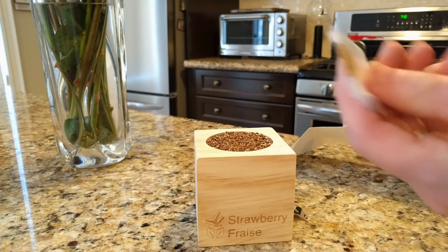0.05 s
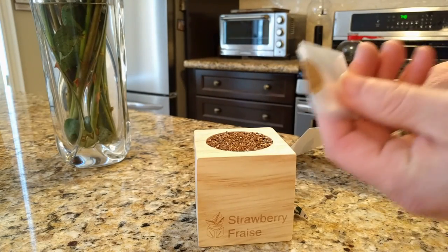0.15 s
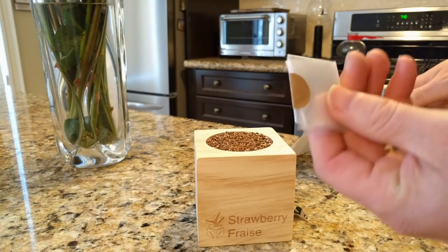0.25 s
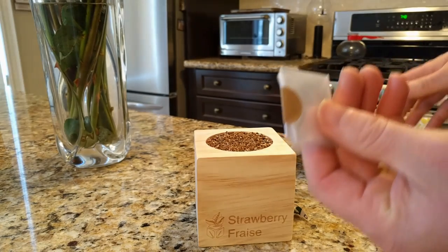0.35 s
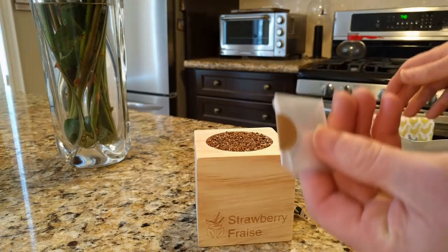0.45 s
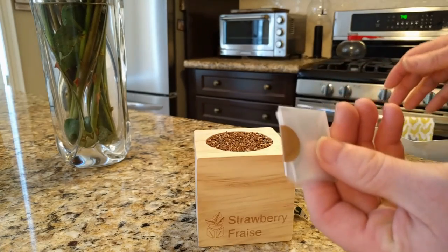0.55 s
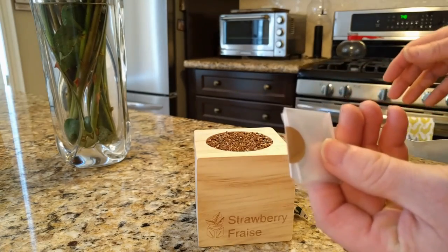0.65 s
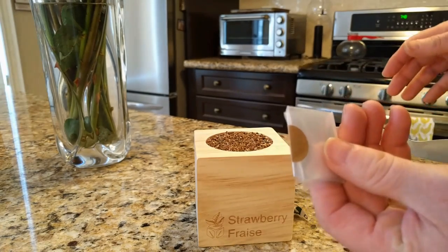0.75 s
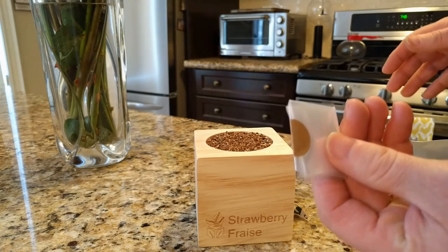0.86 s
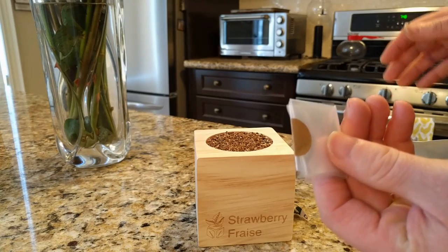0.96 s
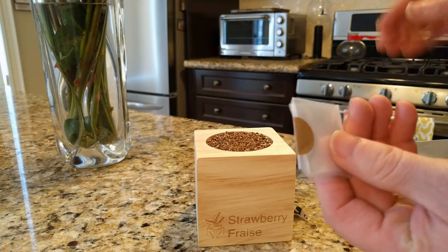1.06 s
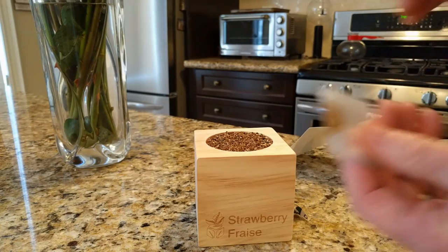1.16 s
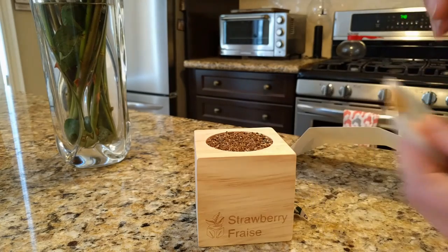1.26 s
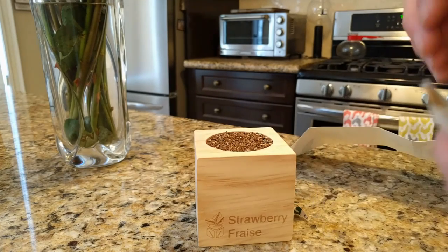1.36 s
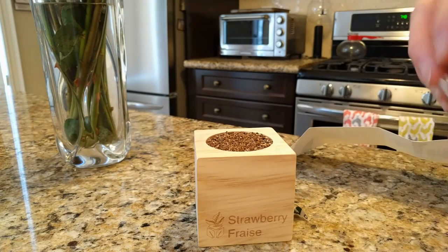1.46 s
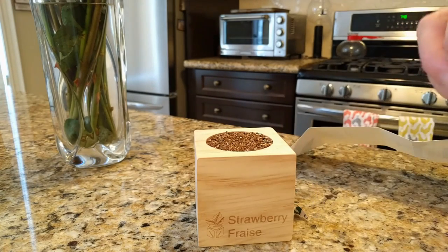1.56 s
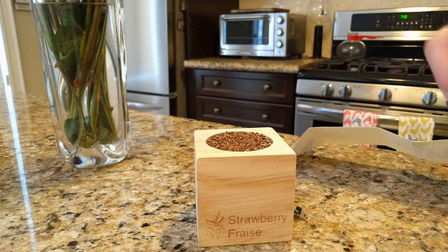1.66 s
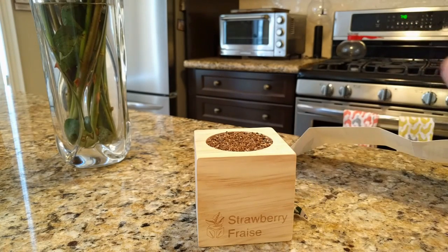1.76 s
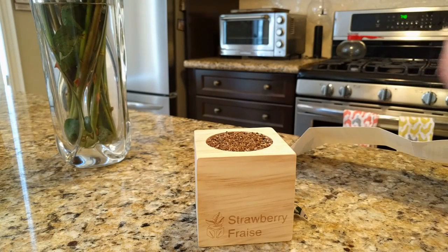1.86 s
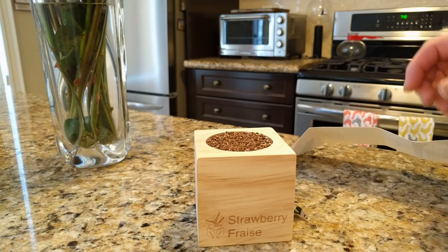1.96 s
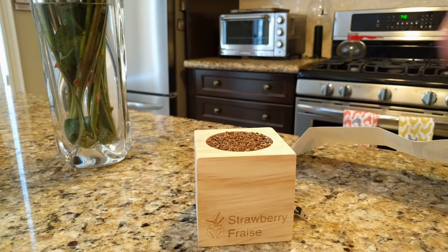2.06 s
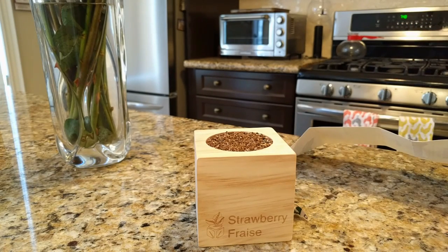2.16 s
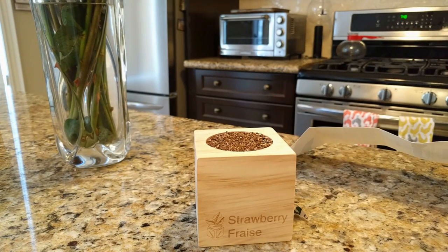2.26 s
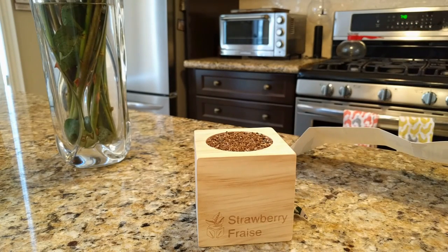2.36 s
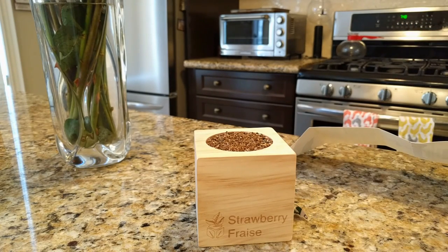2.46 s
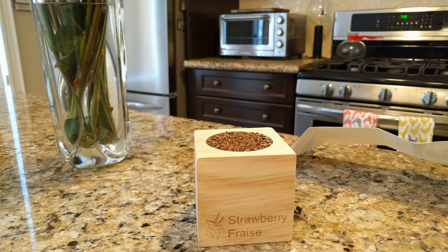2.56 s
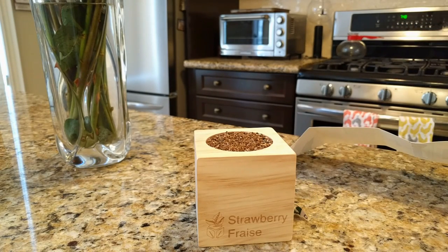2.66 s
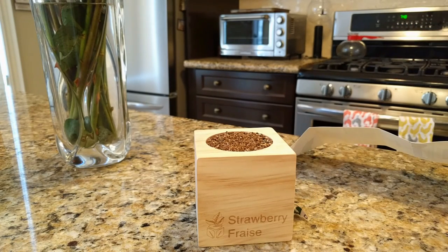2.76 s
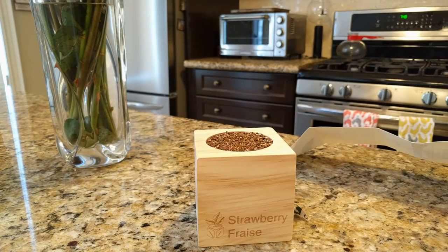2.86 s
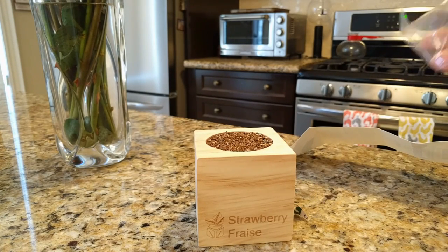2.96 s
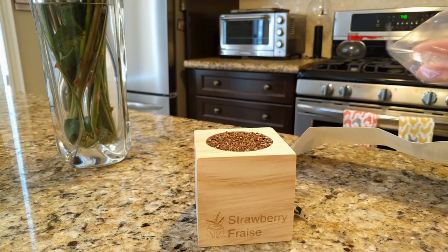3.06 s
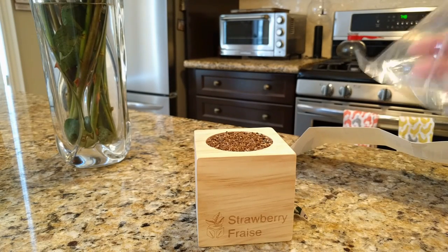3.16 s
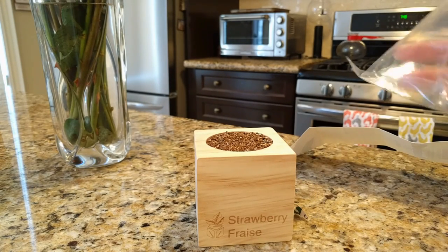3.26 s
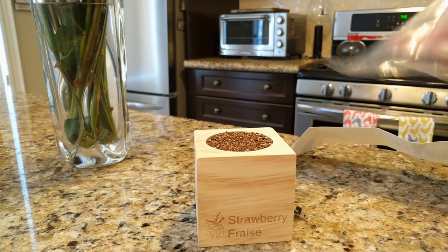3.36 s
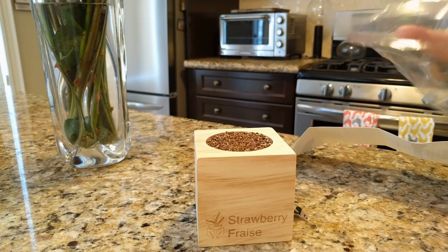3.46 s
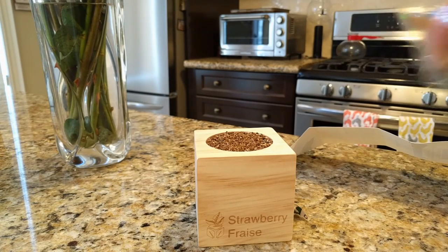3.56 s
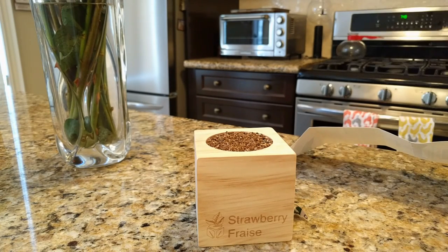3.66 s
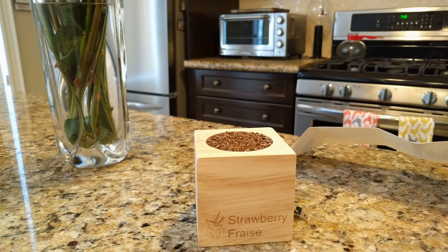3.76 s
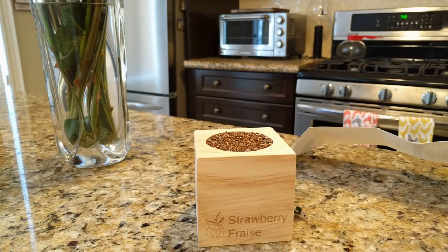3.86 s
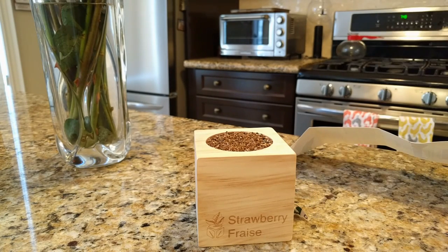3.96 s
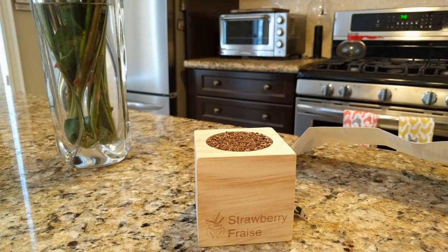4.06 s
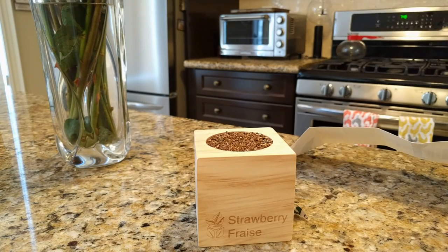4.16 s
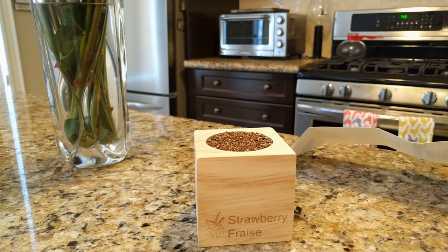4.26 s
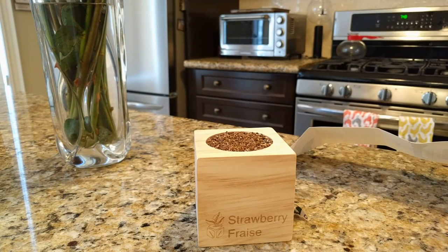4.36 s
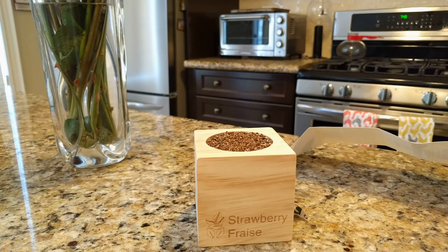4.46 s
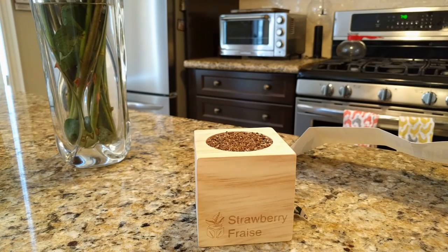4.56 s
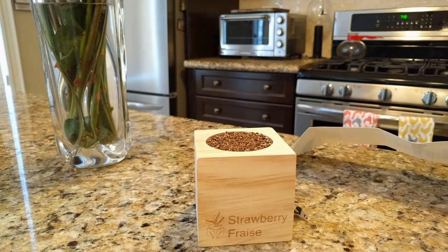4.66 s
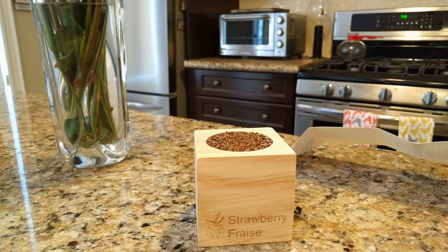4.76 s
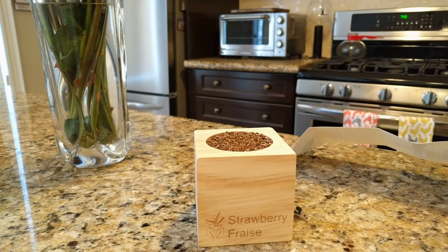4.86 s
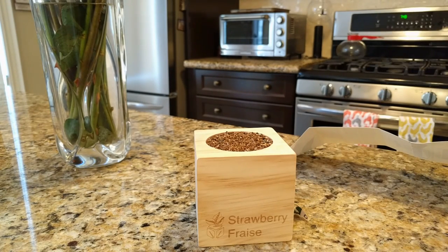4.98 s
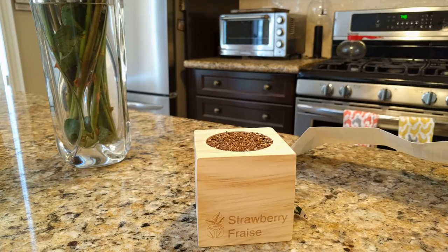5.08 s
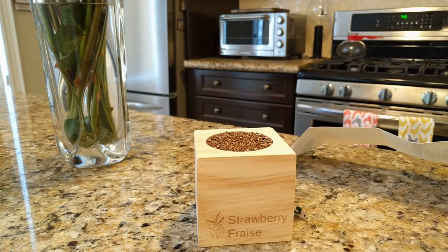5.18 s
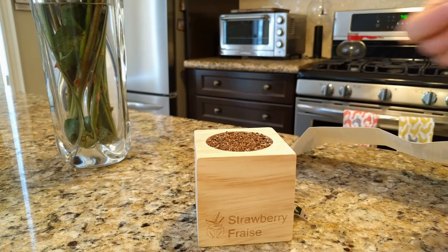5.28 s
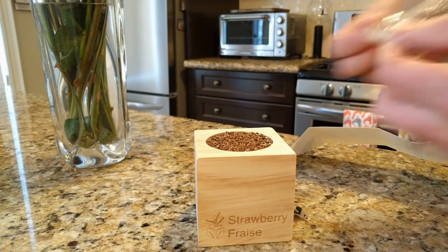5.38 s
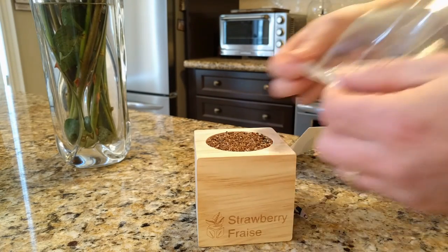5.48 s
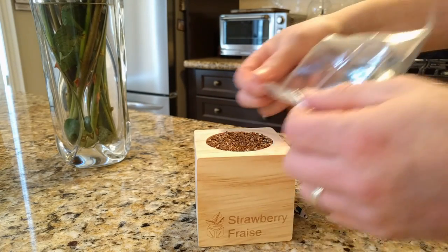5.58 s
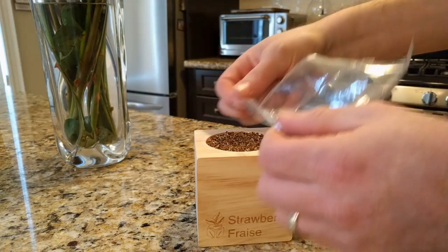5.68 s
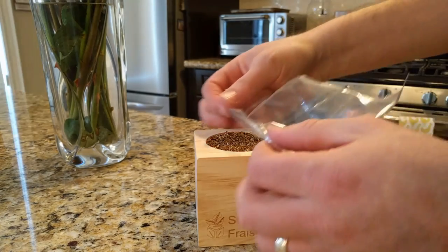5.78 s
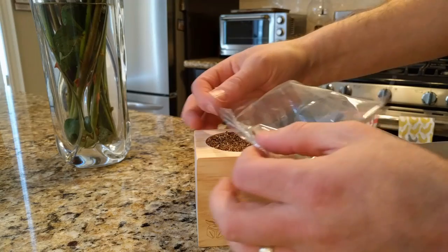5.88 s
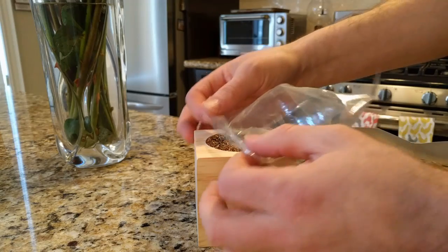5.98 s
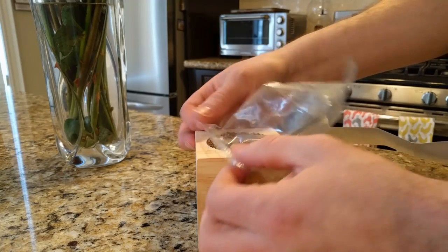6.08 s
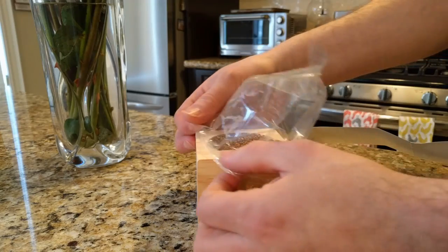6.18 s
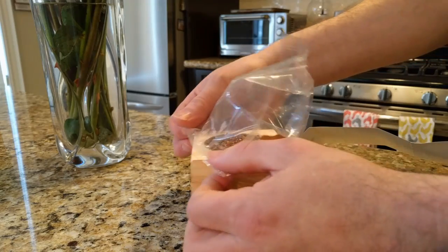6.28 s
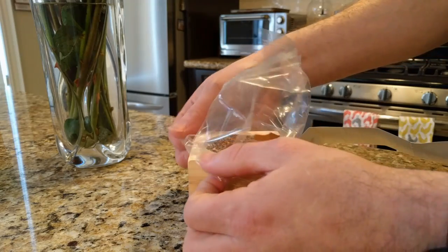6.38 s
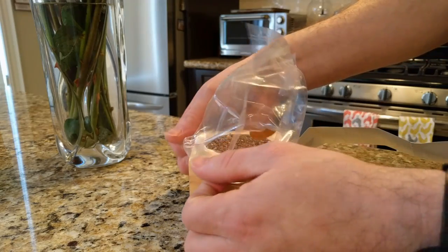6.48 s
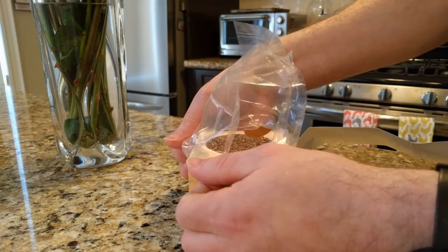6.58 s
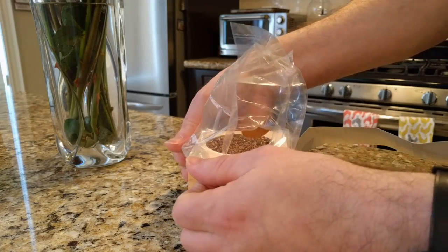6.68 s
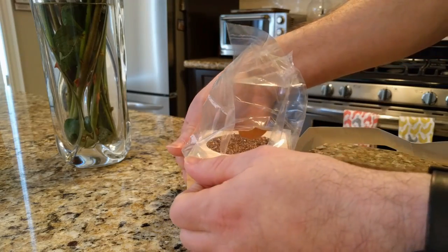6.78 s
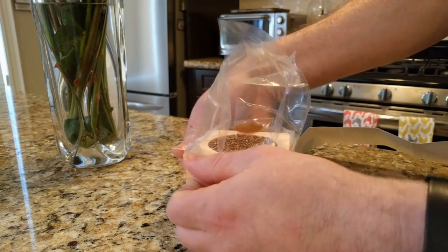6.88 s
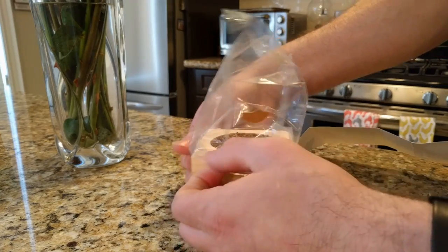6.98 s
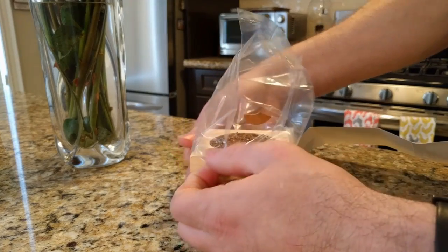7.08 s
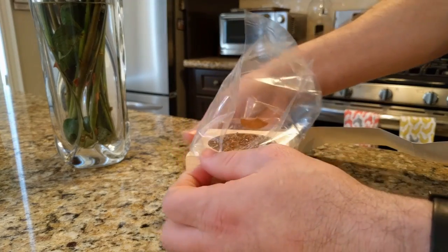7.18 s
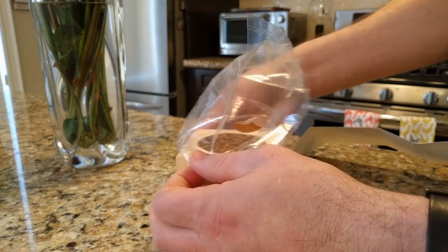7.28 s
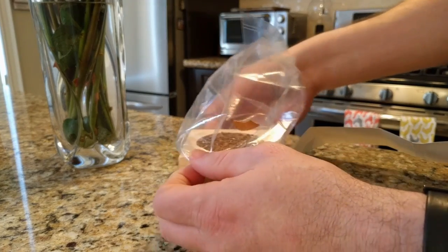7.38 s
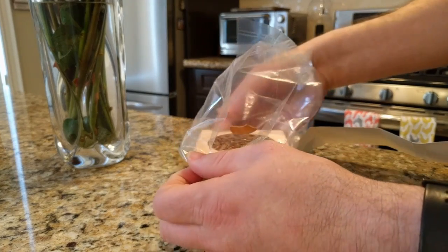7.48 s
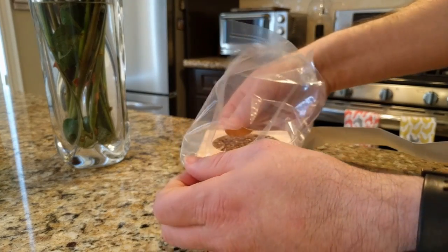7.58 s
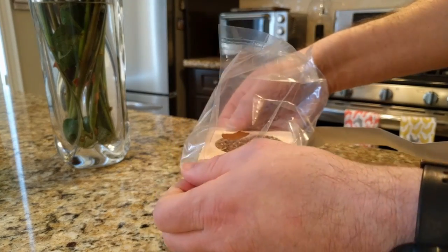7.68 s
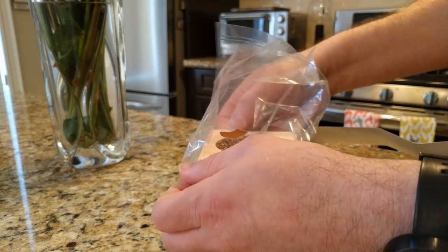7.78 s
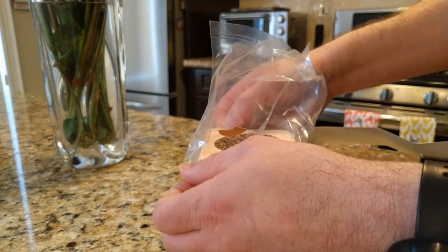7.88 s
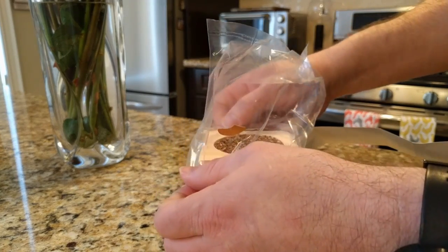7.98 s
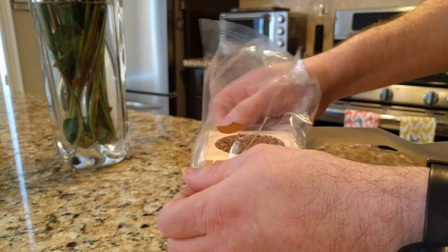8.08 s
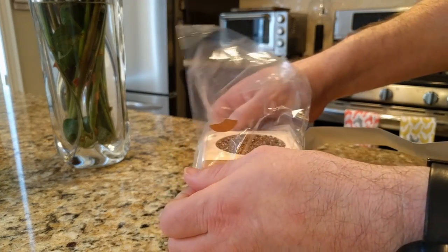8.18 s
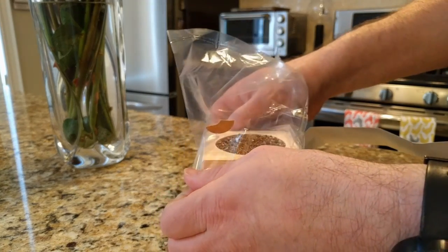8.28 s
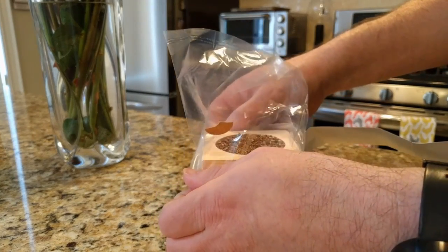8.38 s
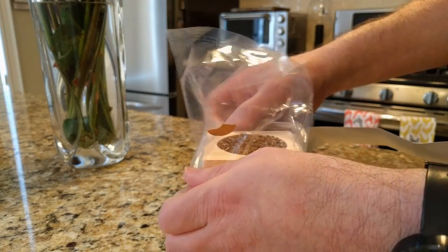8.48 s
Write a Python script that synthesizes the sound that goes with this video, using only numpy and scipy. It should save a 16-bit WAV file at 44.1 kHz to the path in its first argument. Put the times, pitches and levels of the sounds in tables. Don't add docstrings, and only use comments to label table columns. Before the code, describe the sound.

Hands work a thin plastic bag indoors, close and dry with a brief room reflection. A quiet opening with faint hum and small ticks gives way to vigorous crinkling, fine crackle and crisp snaps. After a short lull it crackles again, with low puffs and dull bumps. Pulled over a wooden block, it gives a short hiss of friction, sparser rustles and pops, and finally a faint, very high finger squeak.

```python
import sys
import numpy as np
from scipy import signal
from scipy.fft import rfft, irfft
from scipy.io import wavfile
from scipy.ndimage import uniform_filter1d

SR = 44100
rng = np.random.default_rng(int(sys.argv[2]) if len(sys.argv) > 2 else 0)


def gain_from_db(level_db):
    decades = np.asarray(level_db, float) / 20
    return 10 ** decades


def put_to_file(sound):
    columns = np.atleast_2d(sound).T
    safe = np.clip(columns, -1, 1)
    whole_steps = np.round(safe * 32767)
    wavfile.write(sys.argv[1], SR, whole_steps.astype(np.int16))


N = 376173

# (frequency [Hz], gain [dB])
FILM = [(300, -19.5), (1000, -17.5), (1350, -18), (1650, -9.5), (2300, -5.5), (3800, -5.5), (8000, -2),
        (15000, -1.5)]
# (frequency [Hz], gain [dB])
ON_WOOD = [(200, -12), (600, -4.5), (1000, -5.5), (1600, -1), (2600, 1), (5000, 3), (8000, 3), (15000, 3)]


def evened(x):
    return x / np.sqrt(np.mean(x ** 2) + 1e-20)


def read(points, hz):
    f, value = np.transpose(points)
    return np.interp(np.log(hz + 1), np.log(f + 1), value)


def colour(x, points):
    log_gain = read(points, abs(np.fft.fftfreq(4096, 1 / SR))) * np.log(10) / 20
    taps = np.fft.ifft(np.exp(np.conj(signal.hilbert(log_gain)))).real[:2048]
    return signal.oaconvolve(x, taps)[:len(x)]


def resonate(x, hz, width):
    r = np.exp(-np.pi * width / SR)
    return signal.lfilter([1 - r], [1, -2 * r * np.cos(2 * np.pi * hz / SR), r * r], x)


def soften(x, hz, order=1, kind="low"):
    return signal.sosfilt(signal.butter(order, hz, kind, fs=SR, output="sos"), x)


def bands(x):
    body = soften(x, 7000, order=2)
    return body, x - body


def kitchen():
    # (frequency [Hz], gain [dB])
    floor_colour = [(25, -25), (60, -2), (150, -6), (500, -9.5), (1150, -16.5), (3000, -22.5),
                    (15500, -24.5)]
    # (frequency [Hz], width [Hz], level [dB])
    hum_lines = [(196.6, 14, -70.5), (303.5, 12, -77), (509, 10, -78.5)]
    out = gain_from_db(-66) * evened(colour(rng.standard_normal(N), floor_colour))
    for hz, width, db in hum_lines:
        out += gain_from_db(db) * evened(resonate(rng.standard_normal(N), hz, width))
    return out


def room(x):
    # (frequency [Hz], time to fall 60 dB [s])
    decay_times = [(300, 0.79), (2000, 0.21), (16000, 0.2)]
    taps = np.zeros(SR // 2)
    at = np.arange(300, SR // 2 - 20, 20)
    taps[at + rng.integers(0, 20, len(at))] = rng.choice([-1., 1.], len(at))
    hz, t, z = signal.stft(taps, SR, nperseg=256)
    t60 = np.maximum(read(decay_times, hz), .05)[:, None]
    tail = signal.istft(z * gain_from_db(-60 * t / t60), SR, nperseg=256)[1]
    return signal.fftconvolve(x, tail / np.linalg.norm(tail))[:N]


def air(level_db, clumps, creases):
    # (frequency [Hz], gain [dB])
    puff_colour = [(25, -26), (45, -6.5), (70, 3), (110, -0.5), (550, -3.5), (1000, -10), (1600, -5.5),
                   (4000, -82)]
    t = np.arange(N) / SR
    level_db = np.minimum(level_db, np.where(t > 4, -49, -43))
    shove = np.sqrt(abs(uniform_filter1d(creases ** 2, 250)))
    drive = (gain_from_db(level_db - 5.0 + 3.3 * clumps) + gain_from_db(-26.5) * shove) * rng.standard_normal(N)
    puffs = colour(drive, puff_colour) / np.linalg.norm(colour(signal.unit_impulse(2048), puff_colour))
    deep = soften(puffs, 200)
    thin = soften(puffs, 900, kind="high")
    return puffs - 0.39 * (t > 4.9) * deep - 0.6 * (t > 5.7) * thin


def thumps():
    # (time of peak [s], peak level [dB], hollow [Hz])
    knocks = [(2.2277, -49.5, 523), (2.441, -50, 560), (2.472, -48, 393), (3.528, -48, 730),
              (3.6216, -47, 260), (3.7969, -44, 454), (4.5504, -49, 606), (4.7345, -46, 960),
              (4.847, -55, 580), (5.0452, -46, 776), (5.233, -49, 450), (5.2662, -39.5, 592),
              (5.5829, -48, 1200), (5.7497, -55, 970), (7.8397, -46, 650), (6.2977, -46, 830),
              (6.701, -49, 1270), (6.8093, -45, 390), (7.3255, -49, 880), (7.5344, -52, 675),
              (7.5967, -46, 585), (7.6057, -41, 770), (7.635, -44.5, 1190), (7.674, -50, 726),
              (7.95, -39, 1330), (8.4396, -46, 680)]
    rise_ms = 1.4
    out = np.zeros(N + 900)
    u = np.arange(900) / SR * 1000 / rise_ms
    for (s, db, hz), noise in zip(knocks, rng.standard_normal((len(knocks), 900))):
        shove = u * np.exp(-u) * noise
        knock = resonate(resonate(shove, hz, 0.6 * hz), hz, 1.3 * hz)
        power = uniform_filter1d(knock ** 2, size=130)
        at = round(s * SR) - power.argmax()
        out[at:at + 900] += gain_from_db(db + 0.5) * knock / np.sqrt(power.max())
    return out[:N]


def slide(start, end, hz, db):
    u = np.clip((np.arange(N) / SR - start) / (end - start), 0, 1)
    hiss = rng.standard_normal(N)
    lowered = np.clip(.5 + 5.5 * (u - .62), 0, 1)
    high_hollow = evened(resonate(hiss, 1.1 * hz, 394.0))
    low_hollow = evened(resonate(hiss, 0.904 * hz, 260.0))
    hollow = np.sqrt(1 - lowered) * high_hollow + np.sqrt(lowered) * low_hollow
    return gain_from_db(db) * np.sin(np.pi * u ** 1.05) * ((0.37 + 1.16 * u) * hollow + 1.33 * hiss)


def slides():
    # (start [s], end [s], hollow [Hz], level [dB])
    edge_slides = [
        (0.19, 0.42, 2110, -75),
        (1.64, 1.8, 3500, -77),
        (5.807, 5.921, 3950, -49.5),
        (6.37, 6.44, 3280, -52.5),
    ]
    return sum(slide(*row) for row in edge_slides)


def squeak(rows):
    s, hz, db = np.transpose(rows)
    t = np.arange(N) / SR
    wobble_hz = 24.0 * evened(uniform_filter1d(rng.standard_normal(N), 120))
    turns = np.cumsum(np.interp(t, s, hz) + wobble_hz) / SR
    gate = np.clip(np.minimum(t - s[0], s[-1] - t) / .008, 0, 1)
    level_db = np.interp(t, s, db) - 1.5 + 3.2 * evened(uniform_filter1d(wobble_hz, 900))
    return np.sqrt(2) * gain_from_db(level_db) * gate * np.sin(2 * np.pi * turns)


def squeaks():
    # (time [s], pitch [Hz], level [dB])
    strokes = [
        [(8.015, 13700, -62), (8.06, 13600, -62), (8.13, 14000, -63), (8.3, 13850, -65), (8.39, 13300, -67)],
        [(8.32, 12500, -70), (8.36, 12300, -70), (8.41, 12050, -69)],
        [(8.455, 13000, -65), (8.53, 12350, -63)],
    ]
    return sum(squeak(rows) for rows in strokes)


def hands():
    # (time hardest [s], fine crackle [dB], swell [s], fade [s])
    finger_squeezes = [(0, -58, .1, 0.58), (1.84, -55.5, 0.41, 0.071), (2.282, -35, 0.061, 0.15),
                       (2.545, -35.5, 0.25, 1), (2.75, -31, 0.11, 0.18), (2.921, -33, 0.3, 0.2),
                       (3.098, -37, 0.2, 0.44), (3.223, -36.5, 0.81, 0.067), (3.373, -39, 0.25, 0.26),
                       (3.552, -38.5, 0.11, 0.33), (3.632, -35.5, 0.12, 0.095), (3.779, -40.5, 0.15, 0.13),
                       (4.136, -48, 0.53, 0.83), (4.4, -42.5, 0.27, 0.61), (4.711, -37, 0.15, 0.52),
                       (5.05, -42, 1.3, 0.93), (5.253, -40, 0.35, 0.2), (5.54, -44.5, 1.9, 0.2),
                       (5.75, -54.5, 1.9, 0.38), (6.266, -49.5, 0.76, 0.31), (6.41, -48.5, 0.09, 0.28),
                       (6.79, -52, 0.56, 0.27), (6.954, -47, 0.093, 0.24), (7.25, -53.5, 1.4, 1),
                       (7.458, -42.5, 0.035, 0.11), (7.597, -45, 0.046, 0.14), (7.726, -42.5, 0.035, 0.36),
                       (8.002, -47, 0.34, 0.13), (8.241, -51.5, 0.62, 0.6), (8.436, -48.5, 0.24, 0.41)]
    # (time [s], treble share of the crackle [dB], air pushed at a middling squeeze [dB])
    grip = [(0, -1, -55), (2.15, -4, -60), (2.5, -5.5, -56), (3, -4.5, -59), (3.55, -5.5, -54),
            (4.7, -3.5, -58), (5.7, -3.5, -54.5), (6.0, 1, -48.5), (6.45, -4, -53.5), (7.1, -1.5, -43),
            (7.9, 2, -51), (8.1, -1, -46), (8.5, -2.5, -53.5)]
    rest_db, middling_db = -79.5, -48.5
    t = np.arange(N) / SR
    level_db = np.full(N, rest_db)
    for s, db, swell, fade in finger_squeezes:
        away = np.where(t < s, (s - t) / swell, (t - s) / fade)
        level_db = np.maximum(level_db, db - 20 * away)
    harder_db = level_db - middling_db
    s, treble_db, air_db = np.transpose(grip)
    treble_db = np.interp(t, s, treble_db) + 0.215 * (harder_db - 5.5)
    air_db = np.interp(t, s, air_db) + 0.81 * harder_db
    return level_db, treble_db, air_db


def crackle(level_db, treble_db):
    t = np.arange(N) / SR
    held = t > 2.2
    drift = uniform_filter1d(uniform_filter1d(rng.standard_normal(N), 300), 300)
    clumps = held * np.tanh(evened(drift))
    chance = 640.0 * gain_from_db(4.0 * clumps + 0.4 * (level_db + 48)) / SR
    size = held * gain_from_db(4.1 * np.minimum(rng.exponential(1, N), 1.9)) * (rng.random(N) < chance)
    patch = rng.integers(0, 40, N)
    out = np.zeros(N)
    for k, hz in enumerate(np.geomspace(1400, 13000, num=40)):
        grain = snap(hz, 0.59 * rng.standard_normal(), rng.uniform(0.45, 1.58), -6.0, rng.standard_normal(500))
        grain = evened(grain)[::(-1) ** k]
        out += signal.oaconvolve(size * (patch == k), grain)[:N]
    out /= gain_from_db(0.08 * (level_db + 45))
    rub = gain_from_db(-5.0 + 7.7 * clumps - 0.16 * (level_db + 39)) * rng.standard_normal(N)
    fine = evened(out) + rub
    on_block = np.clip((t - 5.6) / 0.47, 0, 1)
    free_film = evened(colour(fine, FILM))
    block_film = evened(colour(fine, ON_WOOD))
    body, treble = bands((1 - on_block) * free_film + on_block * block_film)
    return gain_from_db(level_db + 2.0) * (body + gain_from_db(treble_db) * treble), clumps


def snap(hz, treble_db, ms, ring_db, noise):
    u = np.arange(len(noise)) / SR * 1000 / ms
    decay = gain_from_db(-12.5 * u ** 1.59) + gain_from_db(-15.5 - 2.17 * u)
    rattle = noise * abs(noise) ** 0.77 * decay * (1 - np.exp(-u / 0.21))
    rattle[8:11] += 4.74 / ms * np.sign(noise[0]) * np.array([1, -1, -.5])
    z = rfft(rattle)
    flat = z / np.sqrt(uniform_filter1d(abs(z) ** 2, size=70))
    rattle = irfft(flat) * np.sqrt(np.sum(rattle ** 2))
    body, treble = bands(rattle)
    body = body - 0.33 * soften(body, 0.18 * hz)
    ring = evened(resonate(rattle, hz, 220.0 + 0.12 * hz)) * np.std(rattle)
    return body + gain_from_db(treble_db - 3.5) * treble + gain_from_db(ring_db + 7600.0 / hz) * ring


def snaps(table, film, gain_db, level_db):
    out = np.zeros(N + 800)
    for (s, db, hz, treble_db), noise in zip(table, rng.standard_normal((len(table), 800))):
        at = round(s * SR)
        drag = gain_from_db(0.3155 * (level_db[at] + 22 - db))
        ms = (1.47 + 610 / hz) * drag
        sound = colour(snap(hz, treble_db, ms, ring_db=-8.5, noise=noise), film)
        peak = np.sqrt(uniform_filter1d(sound ** 2, size=30).max())
        out[at:at + 800] += gain_from_db(db + gain_db) * sound / peak
        out[at - 200:at] += gain_from_db(db + gain_db - 20.0 + 7.0 * noise[1]) * sound[200:0:-1] / peak
    return out[:N]


def ticks(table):
    rise_s = .0004
    return [(s - rise_s, db, hz, 0.5 + 6.5 * np.log2(hz / 5000)) for s, db, hz in table]


def buckling(level_db):
    # (time [s], peak level [dB], ring
    # of the freed patch [Hz], treble against body [dB])
    brushed = [(1.494,-55,4000,-4),(1.562,-58,3150,-10),(1.5785,-58,3200,-15),(1.6234,-50,13600,7),(1.643,-41,7900,6),(1.684,-36.5,8040,8),(1.8133,-45.5,3200,-8),(1.8269,-41,3030,1)]
    unfolded = [(2.26,-32,3300,-12),(2.2743,-25,5900,-1.5),(2.424,-25,2980,2),(2.5193,-20,7300,11),(2.536,-28,11300,4),(2.551,-24,4340,2),(2.557,-23,13600,11),(2.594,-18.5,13800,5),(2.651,-22,13700,10),(2.676,-16,4300,8),(2.6936,-23,10500,5),(2.7072,-24,2160,2),(2.7329,-22,10400,2),(2.7778,-23,10200,8),(2.8713,-22,6770,4),(2.8767,-22.5,4170,-24),(2.9307,-30,5200,-1),(2.9358,-22,6800,1),(3.0133,-28,7050,-3),(3.018,-26,2800,-1),(3.0598,-21.5,4840,-6.5),(3.1032,-30.5,3680,-9),
                (3.2107,-22,3000,-2),(3.227,-19,11200,8),(3.2455,-26,5100,-14),(3.2632,-26,7950,4),(3.2767,-27,11400,8),(3.329,-26.5,2820,2),(3.3681,-24.5,5930,6),(3.372,-21,2950,-2),(3.4286,-25.5,9900,15),(3.4398,-22.5,9500,-25),(3.5374,-30.5,3280,-11.5),(3.557,-21.5,2680,-27),(3.5633,-22,8850,-9),(3.5733,-24.5,2470,-19),(3.5933,-28,2200,-9),(3.644,-27.5,3000,-6),(3.7053,-34.5,1770,-13),(3.7503,-24.5,1760,-1),(3.7568,-32.5,2360,-16),(3.7768,-27,1980,-8),(3.802,-30,7100,9),(3.8718,-23,4300,1),(3.9539,-36.5,2080,-3),(4.039,-34.5,6600,-7),(4.061,-37,5640,1),(4.1217,-35,7500,8),(4.1364,-32.5,4820,-5),(4.1772,-31,6100,3),(4.3024,-30,12400,5),
                (4.4213,-26,13400,13),(4.4574,-21.5,4650,2.5),(4.4748,-31,7900,-1),(4.518,-35,3000,-11),(4.5506,-39,4700,-4),(4.5881,-23.5,12400,1),(4.635,-29.5,2770,4),(4.656,-21.5,12700,11),(4.669,-28.5,4700,-9),(4.684,-28.5,7640,-14),(4.745,-32,2940,17),(4.7663,-27,8100,11),(4.8058,-23,12800,-4),(4.817,-20,8000,-13),(4.8744,-25.5,4940,2.5),(4.904,-21.5,9450,12),(4.941,-25,3020,-3),
                (5.001,-30,7060,-5),(5.046,-22,11200,27),(5.1025,-29.5,1870,-8),(5.1148,-24,7140,7),(5.1468,-27.5,5770,-1.5),(5.1807,-28,12100,-1),(5.197,-27,3700,3),(5.244,-24.5,7400,-3),(5.2548,-23.5,2570,13),(5.266,-22.5,1690,-3.5),(5.347,-30,3340,-2),(5.4124,-32,6500,16),(5.4258,-25,4060,4),(5.45,-19.5,5700,0),(5.471,-28.5,2410,-14),(5.5041,-23,3960,2),(5.5204,-31,4800,1),(5.5417,-35,3000,-6),(5.547,-21.5,13200,10),(5.5736,-24,5130,2)]
    pulled_over = [(5.655,-35,6660,6),(5.8095,-39,5100,7),(5.8795,-34,4100,0),(5.9654,-28,6500,1),(6.1829,-31.5,4470,-6),(6.1979,-30,5470,4),(6.2231,-35,2670,6),(6.2311,-33,5600,-14),(6.244,-32,11000,-6),(6.2641,-26.5,7860,-12),(6.2759,-28.5,3070,-5),(6.2957,-32.5,4500,-1),(6.4804,-40,6600,-3),(6.4896,-41,1810,-33),(6.5266,-34.5,8800,-22),(6.548,-39,1720,-6),(6.5618,-37,13800,-1),(6.5832,-35.5,8500,-10),(6.6093,-29,2930,-9),(6.6431,-31.5,8600,1),(6.6886,-32.5,1720,1.5),(6.7062,-33.5,3600,0),(6.72,-33,1130,-1),(6.7724,-27,5100,3),(6.8033,-37,6230,-19),(6.8083,-25.5,5730,3.5),
                   (6.9398,-31,6000,-2),(6.9877,-35,10500,0),(7.0569,-32,3770,-21),(7.0767,-33,2720,6),(7.106,-20.5,3130,-4.5),(7.188,-38,3020,3),(7.3255,-41,5200,-9),(7.3408,-24,5360,-3),(7.4394,-28,11300,10),(7.4554,-37,12800,3),(7.5434,-30,3450,-25),(7.571,-39,2520,-17),(7.587,-28,2830,0),(7.5954,-28,11400,-3),(7.6737,-23.5,7500,-20),(7.6986,-23,4470,8),(7.7121,-20.5,11600,18),(7.7705,-40.5,780,-13),(7.7787,-25.5,3700,7),(7.783,-25,2850,1),
                   (7.808,-37,764,-6),(7.8379,-29.5,1270,-5),(7.8877,-26.5,10100,7),(7.9055,-34,810,-8),(7.928,-28,5300,-2),(7.9508,-26.5,5000,-5),(7.966,-31,10900,5),(7.982,-35,2630,0),(8.1018,-54,2700,-11),(8.1343,-33,3420,5),(8.172,-43,4300,-5),(8.2,-32,10300,-4),(8.2253,-21.5,6270,6.5),(8.238,-35,3280,-15),(8.2996,-32.5,2850,-7),(8.3205,-38,10400,4),(8.3722,-41,3600,-3),(8.4171,-28.5,9000,-12),(8.423,-25,12100,-8),(8.4513,-31.5,3670,0),(8.5264,-29,4670,-2)]
    # (time of peak [s],
    # peak level [dB], ring [Hz])
    ticks_free = [(1.5396, -58, 7000), (2.2066, -44, 2710), (2.2942, -30, 2780), (2.2972, -30.0, 14430),
                  (2.3273, -32, 6120), (2.3791, -35, 6590), (2.4707, -35.0, 2670), (2.5376, -26, 10960),
                  (2.5627, -26, 2330), (2.5837, -20, 15180), (2.6073, -26, 12580), (2.6727, -24, 4030),
                  (2.6834, -24, 11480), (2.7024, -30, 2000), (2.7442, -22, 9690), (2.7486, -22.5, 9600),
                  (2.7897, -28, 2070), (2.7947, -19.5, 14940), (2.8176, -28, 2090), (2.8262, -37, 15140),
                  (2.8295, -25, 12680), (2.8439, -30, 8790), (2.9711, -26, 3270), (2.5051, -30, 2950),
                  (2.9945, -23, 2670), (3.0003, -29, 2560), (3.0061, -28, 2890), (3.0707, -28, 12980),
                  (3.0911, -24, 7190), (3.1095, -22, 12420), (3.1657, -22.5, 4440), (3.2168, -31, 2320),
                  (3.2208, -30, 2470), (2.7298, -21.5, 2060), (3.2671, -29, 2730), (3.3041, -29, 11910),
                  (3.3131, -32, 3250), (3.3507, -25, 6090), (3.4735, -35, 2610), (2.7546, -26, 7320),
                  (3.5277, -34, 2500), (3.5329, -29, 6700), (2.773, -25, 6290), (2.7861, -29, 4690),
                  (3.6042, -31, 3080), (3.6508, -31, 9690), (3.7714, -31.0, 7280), (3.7891, -36, 13930),
                  (3.3207, -34, 2150), (3.9195, -42, 3110), (4.1332, -33, 8100), (4.1859, -38, 8550),
                  (4.2023, -38, 2370), (4.3807, -37, 3100), (4.392, -34, 4110)]
    ticks_late = [(4.4088, -30, 6760), (4.495, -34, 7110), (4.5387, -36, 3660), (4.5665, -39, 4400),
                  (4.5988, -28, 13610), (4.6165, -29, 11350), (4.6295, -36, 5490), (4.7457, -27, 3900),
                  (4.858, -32, 7490), (4.8809, -27, 12000), (4.9248, -37, 2580), (5.0108, -35, 3300),
                  (5.0774, -29, 7490), (5.1345, -33, 2280), (5.2016, -30.5, 3300), (5.87, -33, 4090),
                  (5.3136, -32, 6030), (5.372, -36, 4600), (4.8426, -29, 7540), (5.559, -33.5, 14320),
                  (5.6913, -43, 2010), (5.8198, -35, 5000), (5.829, -29, 12060), (5.9315, -37.5, 12060),
                  (6.0329, -44.0, 4500), (6.0463, -41, 2840), (6.0807, -33.5, 7500), (4.7121, -28, 4180),
                  (4.8501, -27, 7540), (6.3719, -42, 3290), (6.4451, -44, 15000), (6.4309, -36.5, 3730),
                  (6.4661, -39, 7040), (6.6612, -40, 1890), (6.6803, -48, 2390), (7.0288, -35.5, 2560),
                  (7.0909, -33, 5080), (7.2534, -38, 8330), (7.2803, -44, 2220), (7.908, -23, 4370),
                  (5.2894, -34, 6500), (7.4, -36.5, 15050), (7.4356, -42.0, 6890), (7.5038, -36, 11350),
                  (7.5345, -38.5, 1790), (7.5675, -38.0, 2570), (5.2098, -30, 6800), (7.6764, -26, 2140),
                  (7.7144, -22, 8330), (7.7613, -37, 2840), (7.9409, -32, 6960), (5.2295, -31, 4870),
                  (8.0091, -30, 10530), (8.0195, -33, 5740), (8.102, -30.5, 2760), (8.4339, -32, 2700),
                  (8.3298, -45, 8300), (5.838, -43, 1750),
                  (4.788, -30, 4500), (5.7228, -42, 2400), (5.751, -44, 3000), (5.774, -44, 4660),
                   (5.9917, -36.5, 2920), (4.9354, -34, 2890), (7.011, -42, 2410), (7.116, -36, 3500)]
    out = snaps(brushed + unfolded, FILM, -0.66, level_db)
    out += snaps(pulled_over, ON_WOOD, 1.7, level_db)
    out += snaps(ticks(ticks_free), FILM, -2.5, level_db)
    out += snaps(ticks(ticks_late), ON_WOOD, -2.0, level_db)
    return out


def scene():
    level_db, treble_db, air_db = hands()
    fine, clumps = crackle(level_db, treble_db)
    creases = buckling(level_db)
    bag = creases + thumps() + fine + squeaks() + slides()
    mix = bag + gain_from_db(-14.0) * room(bag) + air(air_db, clumps, creases) + kitchen()
    return mix[None]


def roll_off(x):
    return signal.sosfilt(signal.butter(12, 16970, fs=SR, output="sos"), x)


def record(dry):
    low_pass = signal.firwin(511, 15760, window=("kaiser", 8), fs=SR)[None]
    top_pass = signal.firwin(511, 16800, window=("kaiser", 8), fs=SR)[None]
    below = signal.oaconvolve(dry, low_pass, "same")
    top = signal.oaconvolve(dry - below, top_pass, "same")
    bright = signal.lfilter([1, -1], [1], dry) ** 2
    sudden = uniform_filter1d(bright, size=90) > 9.5 * uniform_filter1d(bright, size=1500, origin=500)
    opening = np.clip(uniform_filter1d(sudden * 1., size=450) * 5.7, 0, 1)
    mix = below + gain_from_db(-21.0) * opening * top - .0005
    return roll_off(mix)


dry = scene()
out = record(dry)
put_to_file(out)
```